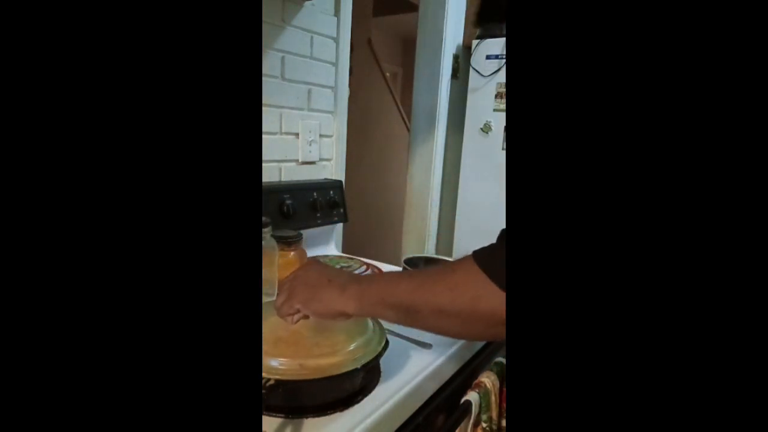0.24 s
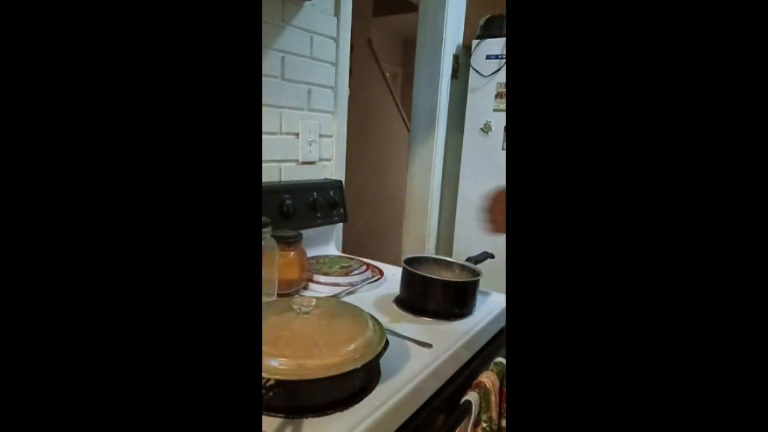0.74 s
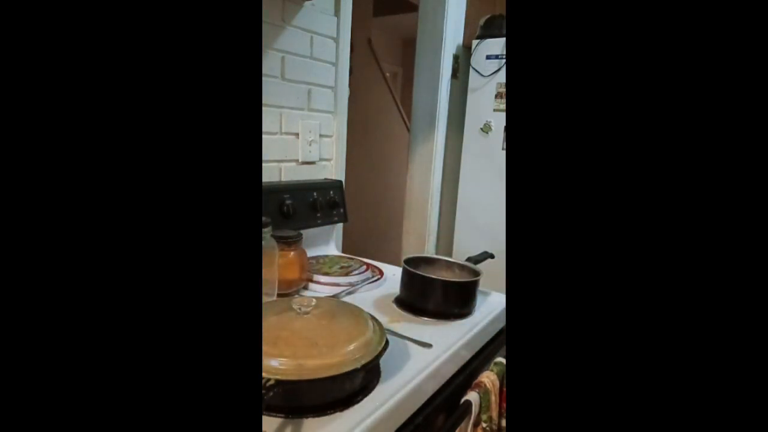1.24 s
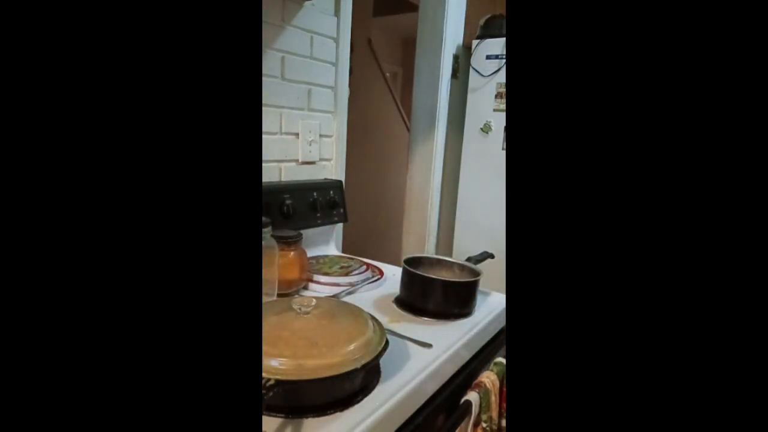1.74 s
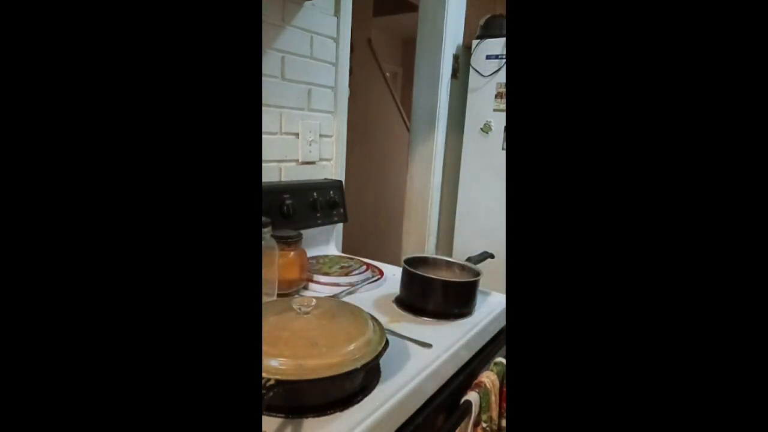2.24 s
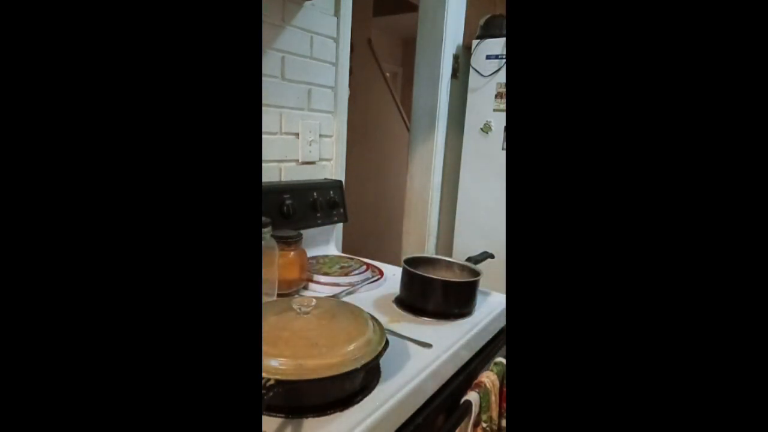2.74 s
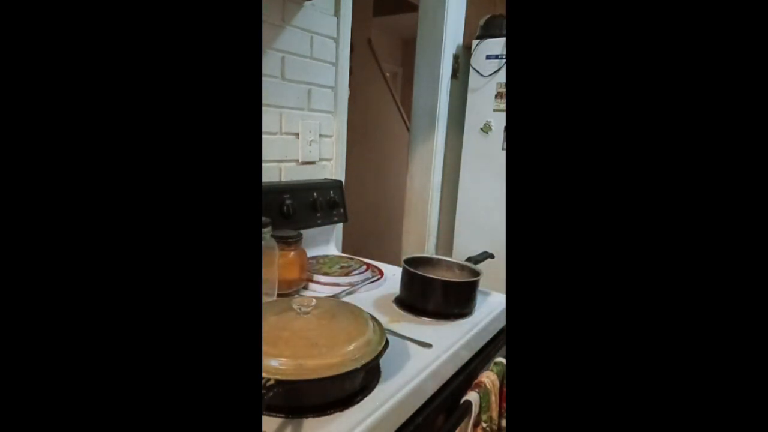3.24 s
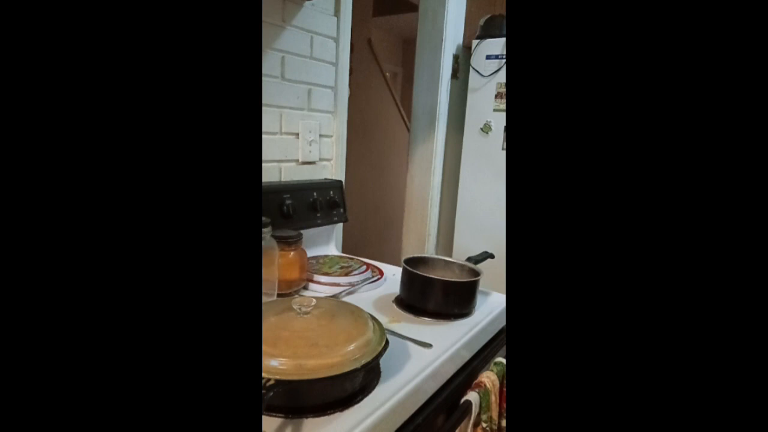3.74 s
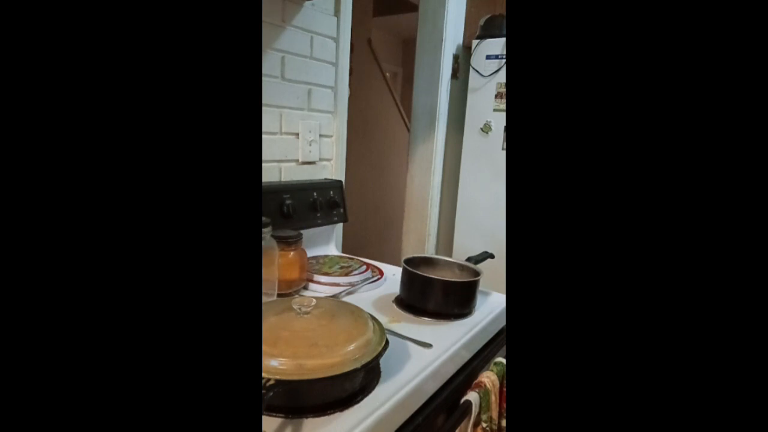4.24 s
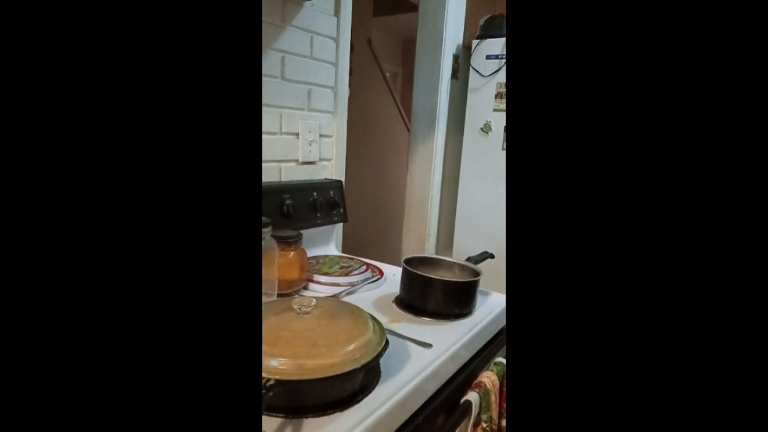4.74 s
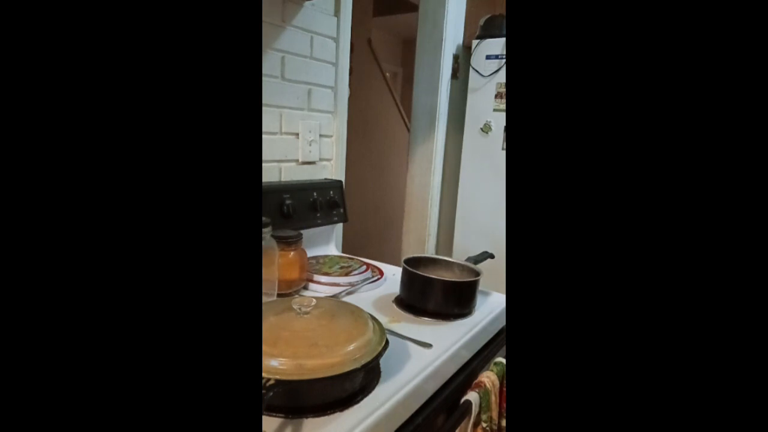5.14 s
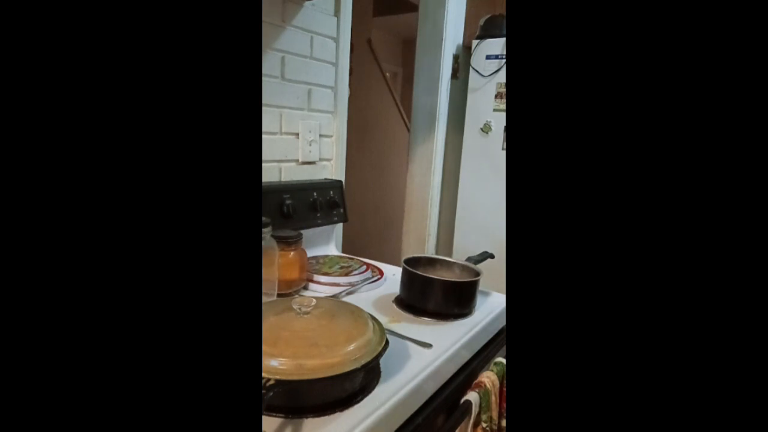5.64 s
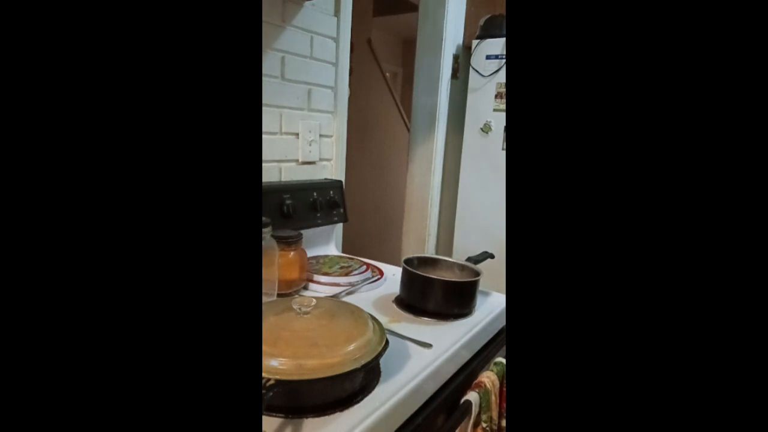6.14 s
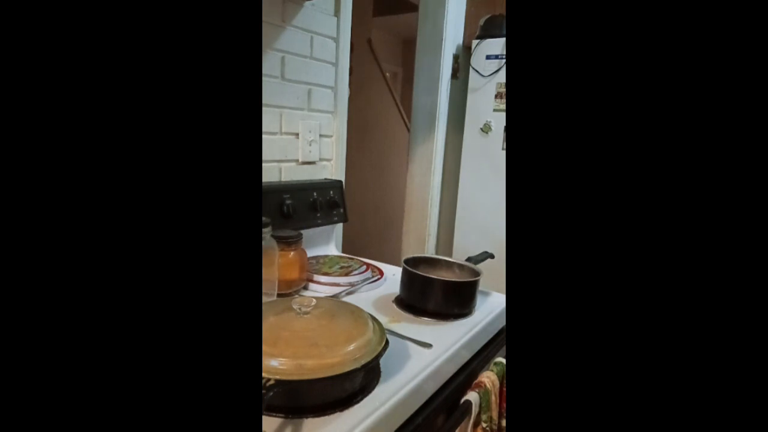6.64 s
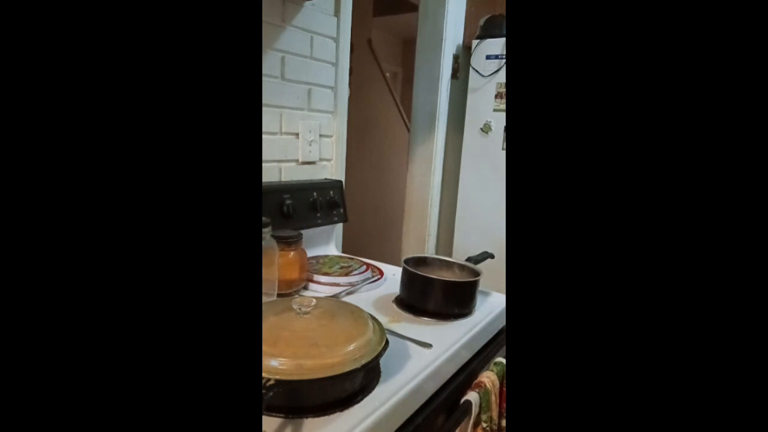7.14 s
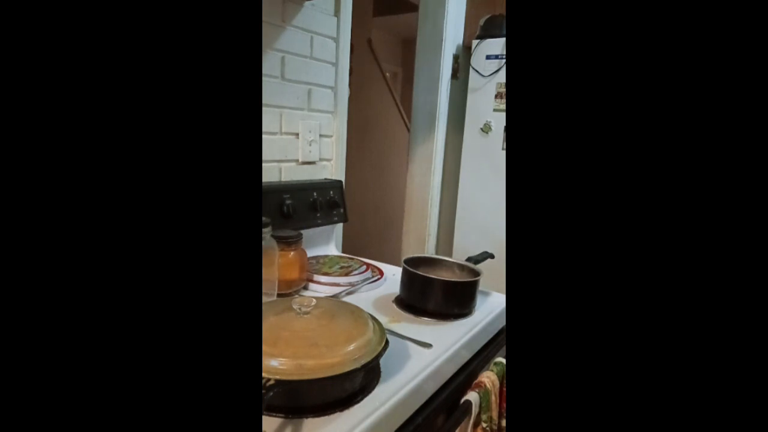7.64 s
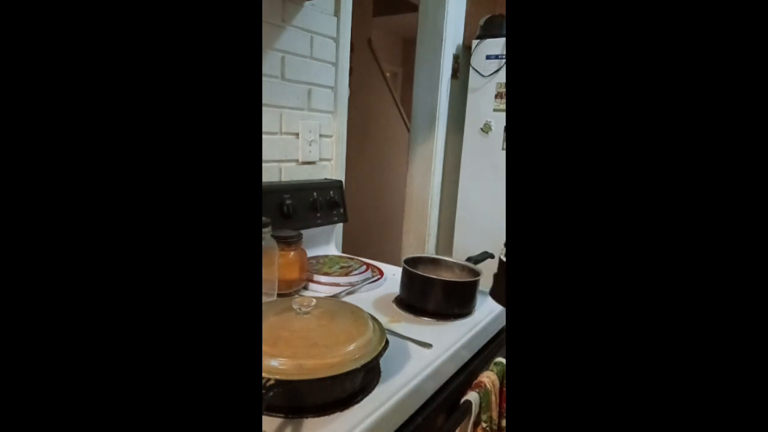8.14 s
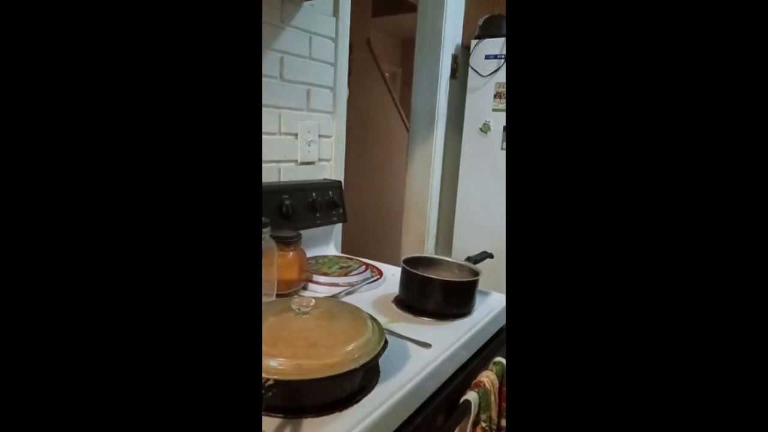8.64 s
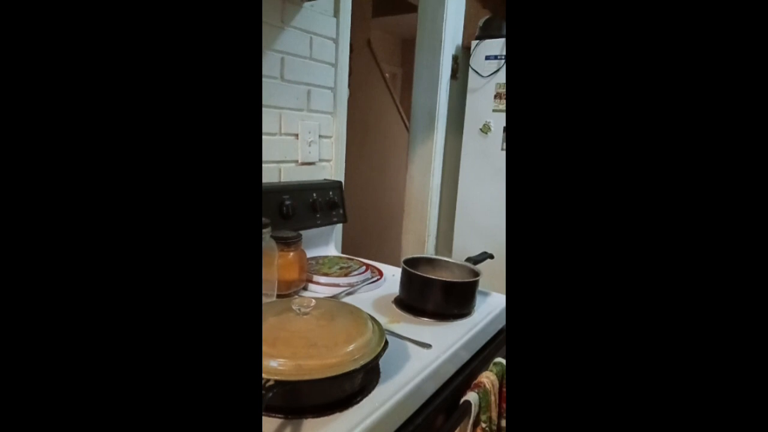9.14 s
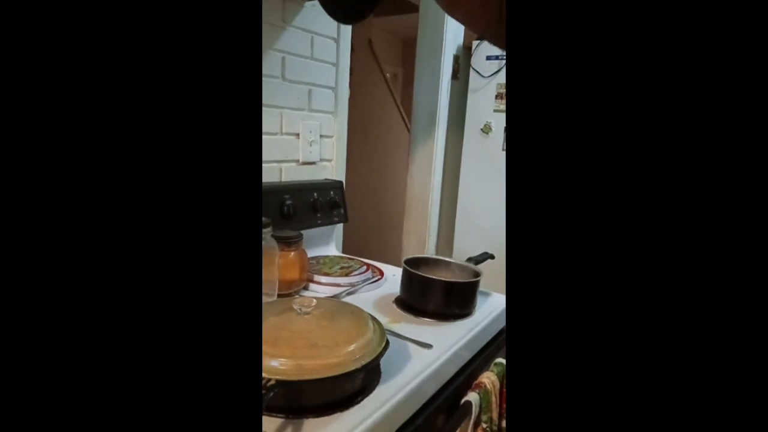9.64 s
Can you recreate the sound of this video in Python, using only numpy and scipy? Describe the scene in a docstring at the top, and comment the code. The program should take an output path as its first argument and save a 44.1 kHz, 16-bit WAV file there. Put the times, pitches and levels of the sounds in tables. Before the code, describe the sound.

Thin aluminium foil pan crumpled in sharp crackling bursts in a small kitchen, pausing and rustling, then buckling loudly and ringing before falling quiet.

```python
"""A thin aluminium foil pan is crumpled, shifted and set down in a small hard kitchen, with a low room hum of
shaped noise under all. The hand grips: creases of three sizes buckle in showers of filtered clicks, and dented
panels flip as noisy pitched rings. Throughout, among the grips, single folds snap as short bright cracks, and
soft thumps of low sines come through the floor. Late on, the pan floor rings as its modes are tapped. Sparse
echo taps make the room, and the microphone port peaks sharply in the treble."""
import sys
import numpy as np
from scipy import signal
from scipy.io import wavfile
from scipy.ndimage import uniform_filter1d

SR = 44100
rng = np.random.default_rng(int(sys.argv[2]) if len(sys.argv) > 2 else 0)


def waveform_to_disk(signal):
    """Save audio, clipped to [-1, 1], as 16-bit WAV at the path in sys.argv[1]."""
    frames = np.transpose(np.atleast_2d(signal))
    scaled = np.clip(frames, -1, 1) * 32767
    samples = np.round(scaled).astype(np.int16)
    wavfile.write(sys.argv[1], SR, samples)


N = 436149  # length in samples


def gain_of(db):
    """Decibels to an amplitude factor."""
    return 10 ** (np.asarray(db) / 20)


def read(points, hz):
    """A spectrum table read on a log-frequency axis."""
    table_hz, value = np.transpose(points)
    return np.interp(np.log(hz + 1), np.log(table_hz + 1), value)


def patches(shape, bins, frames):
    """Smooth chance over frequency and time, of spread 1; shape is (frames, bins), the result is turned."""
    field = uniform_filter1d(rng.standard_normal(shape), frames, 0)
    field = uniform_filter1d(field, bins, 1).T
    return field / field.std()


def alike(z, hz):
    """Long waves reach both microphones alike, so the low bins of the two spectra share more of their sound."""
    # likeness of left and right in diffuse sound: pitch_hz [Hz], likeness [0 to 1]
    likeness = [(60, 0.93), (200, 0.82), (640, 0.18), (2000, 0.049)]
    same = np.clip(read(likeness, hz), -1, 1)[:, None]
    return np.array([z[0], same * z[0] + np.sqrt(1 - same ** 2) * z[1]])


def hum():
    """Room tone: random short-time spectra with a fixed colour and faint drifting patches."""
    # colour of the room tone: pitch_hz [Hz], relative_density_db [dB per Hz]
    colour = [(32, -25), (60, 8.5), (104, -12), (200, -2), (323, -10), (1150, -26), (4200, -40),
              (16000, -51.5)]
    level_db = -48.5
    hz, frames = np.fft.rfftfreq(1024, 1 / SR), N // 256 + 5
    real, imag = rng.standard_normal((2, 2, len(hz), frames))
    drift_db = 1.5 * patches((frames, len(hz)), 6, 30)
    z = alike(real + 1j * imag, hz) * gain_of(read(colour, hz)[:, None] + drift_db)
    x = signal.istft(z, nperseg=1024, noverlap=768)[1][:, :N]
    return gain_of(level_db) * x / x.std()


def band(x, lo_hz, hi_hz):
    """Band-pass."""
    edges_hz = [lo_hz, min(hi_hz, SR / 2.1)]
    return signal.sosfilt(signal.butter(3, edges_hz, "band", fs=SR, output="sos"), x)


def clicks(per_s, spread_db):
    """Random clicks, many small and a few large, of mean power 1."""
    size = gain_of(spread_db * np.minimum(rng.exponential(1, N), 5))
    size *= rng.choice([-1, 1], N)
    train = size * (rng.random(N) < per_s / SR)
    return train / np.sqrt(np.mean(train ** 2))


def foil_ring(lo_hz, hi_hz, t60_s, shiver, size=4000):
    """A buckling tick and the dense shiver of the sheet, different at each microphone; energy 1 in each."""
    t = np.arange(size) / SR
    decay = gain_of(-60 * t / np.clip(t60_s, .005, 1))
    ring = shiver * rng.standard_normal((2, size)) * decay
    ring[[0, 1], rng.integers(0, 24, 2)] += 1  # the spot lies nearer to one microphone
    ring = band(ring, lo_hz, hi_hz)
    return ring / np.linalg.norm(ring, axis=1)[:, None]


def grip_power():
    """Each grip of the hand closes, holds, then fades; power for every crease size, by the millisecond."""
    # grips: hold_start_s [s], rise_s [s, 2 ms or more], hold_s [s], fade_s [s, 10 ms or more],
    # fine_db [relative dB], middle_db [dB above fine], wide_db [dB above fine]; each size adds its own level
    grips = [(0.308, 0.011, 0.034, 0.074, -50.5, -20, -41), (0.704, 0.015, 0.0065, 0.11, -49, -20, -38),
             (0.853, 0.04, 0.023, 0.24, -47.5, -16.5, -17), (1.076, 0.025, 0.08, 0.066, -25, -8.5, -11.5),
             (1.139, .02, 0.099, 0.29, -28, -10.5, -19.5), (1.448, 0.059, 0.074, 0.038, -42.5, 0.5, -20),
             (1.49, 0.006, 0.048, 0.53, -24.5, -15, -16.5), (1.581, 0.017, 0.022, 0.16, -26.5, -9, -23),
             (1.647, 0.025, 0.034, 0.61, -26.5, -14.5, -12), (1.789, 0.011, 0.078, 0.11, -30, -7.5, -21),
             (1.988, 0.004, 0.041, 0.092, -28, -10.5, -31), (2.158, 0.014, 0.0086, 0.071, -40, -22, -24),
             (2.233, 0.034, 0.031, 0.16, -43.5, -4, -10), (2.305, 0.023, 0.032, 0.21, -40, -6.5, -18),
             (2.555, 0.0048, 0.035, 0.17, -45, -5.5, -14), (2.695, 0.0062, 0.015, 0.1, -49, 7, -39),
             (2.783, 0.0037, 0.025, 0.12, -47.5, 6, -37), (2.964, 0.02, 0.055, 0.15, -41.5, -8.5, -16),
             (3.066, 0.013, 0.022, 0.68, -36.5, -19.5, -35), (3.201, 0.11, 0.015, 0.17, -53, 4.5, 0),
             (3.316, 0.036, 0.077, 0.13, -25.5, -7, -8), (3.53, 0.0094, 0.0056, 0.17, -42, -0.5, -44),
             (3.587, 0.0051, 0.013, 0.17, -32, -16.5, -21), (3.79, 0.16, 0.092, .1, -45, -12, -9),
             (3.82, 0.01, 0.01, 0.42, -33, -3.5, -2.5), (4.194, 0.003, 0.012, 0.28, -43.5, -11.5, -17.5),
             (4.413, 0.0092, 0.042, 0.13, -55, -10.5, 3.5), (4.567, 0.032, 0.086, 0.096, -33.5, -9, -3.5),
             (4.674, 0.0087, 0.051, 0.055, -42.5, -6.5, 1), (4.782, 0.14, 0.014, 0.48, -40, -19.5, -10),
             (5.001, 0.032, 0.014, 0.11, -36, -9, -1), (5.06, 0.016, 0.016, 0.11, -37.5, -8, -5.5),
             (5.247, 0.044, 0.03, 0.62, -52.5, -11.5, -6), (5.566, 0.007, 0.006, 0.18, -49, -15, -38),
             (5.684, 0.009, 0.0074, 0.16, -31.5, -11.5, -7), (5.81, 0.02, 0.097, 0.32, -41, -12, -19),
             (6.049, 0.049, 0.022, 0.12, -39, -11.5, -10.5), (6.273, 0.079, 0.023, 0.13, -33, -10, 4.5),
             (6.323, 0.012, 0.094, 0.38, -24, -10, -2.5), (6.591, 0.015, 0.059, 0.11, -26, -6.5, 3),
             (6.683, .05, 0.1, 0.38, -40, -7, -2.5), (7.13, 0.008, 0.036, 0.34, -25.5, -5, -5),
             (7.407, 0.0018, 0.097, 0.1, -36, -11.5, -5.5), (7.66, 0.2, 0.071, 0.15, -48, -8, -5.5),
             (7.78, .006, 0.22, 1, -34, -6, -1), (7.929, 0.31, 0.43, 0.12, -26, -14, -6.5),
             (8.466, .02, 0.0086, 0.85, -64, -13, -16.5), (9.317, 0.03, 0.018, 0.11, -54.5, -9.5, -30)]
    slope_db = -30  # one rise time before the hold, or one fade time after it for fine creases
    start, rise, hold, fade, fine_db, middle_db, wide_db = np.transpose(grips)[:, :, None]
    t = np.arange(0, N / SR + .01, .001) - start
    before = np.maximum(-t, 0) / np.maximum(rise, .002)
    after = np.maximum(t - hold, 0) / np.maximum(fade, .01)
    powers = []
    for size_db, haste in ((0, 1), (middle_db, 1.3), (wide_db, 1.3)):  # larger creases settle sooner
        grip_db = fine_db + size_db + slope_db * (before + haste * after)
        powers.append((gain_of(grip_db) ** 2).sum(0))
    return powers


def crumple(spots=6):
    """Showers of clicks from creases of each size, spread over several spots of the sheet."""
    # crease sizes, fine to wide: low_hz [Hz], high_hz [Hz] (outer edges, narrowed per spot), clicks_per_s [1/s],
    # size_spread_db [dB], ring_t60_s [s], relative_level_db [dB]
    creases = [(3020, 15540, 1400, 2.5, 0.034, -2), (1185, 4960, 700, 0.5, 0.079, 11.5),
               (409, 1700, 450, 1.5, 0.077, 4.5)]
    out, time_ms = np.zeros((2, N)), np.arange(N) / SR * 1000
    for power, (lo_hz, hi_hz, per_s, spread_db, t60_s, db) in zip(grip_power(), creases):
        level = gain_of(db) * np.interp(time_ms, np.arange(len(power)), np.sqrt(power))
        train = clicks(per_s, spread_db) * level
        spot = rng.integers(0, spots, N)
        for i in range(spots):
            low, high = rng.uniform(1, 1.4, 2)  # each spot has a colour of its own
            ring = foil_ring(lo_hz * low, hi_hz / high, t60_s, 0.15, size=2048)
            out += signal.oaconvolve((train * (spot == i))[None], ring, axes=1)[:, :N]
    hz, t, z = signal.stft(out, SR, nperseg=512, noverlap=384)
    shape = (len(t), len(hz))
    # the resonances of the sheet shift as it bends, and the creases give way in clumps
    resonance_db = 3.0 * patches(shape, 5, 12)
    clump_db = 0.72 * patches(shape, 66, 3)
    note_db = 5 * np.maximum(patches(shape, 2, 22) - 1, 0)  # brief narrow notes ring out
    z = alike(z, hz) * gain_of(resonance_db + clump_db + note_db)
    return signal.istft(z, SR, nperseg=512, noverlap=384)[1][:, :N]


def pops():
    """A dented panel flips or drags and shivers around its own pitch: wide is a knock, narrow a squeak."""
    # flipping panels: start_s [s], relative_peak_db [dB], pitch_hz [Hz], t60_s [s, before the swell and end fade],
    # spread [factor up and down, 1.02 or more]
    panels = [(0.894, -45, 1930, 0.04, 1.09), (1.25, -32, 1880, 0.25, 1.2), (.404, -66, 2550, 0.15, 0.96),
              (5.574, -53, 1380, 0.075, 1.06), (2.075, -52.5, 1300, .3, 1.02),
              (2.153, -51, 3000, 0.18, 1.14), (2.246, -49, 1010, 0.27, 1.03),
              (3.531, -41, 2750, 0.037, 1.08), (3.735, -44, 1660, 0.7, 1.06), (3.971, -45, 1030, 1, 1.1),
              (3.799, -51, 314, 0.8, 0.95), (4.198, -32.5, 3500, 0.15, 1.13), (6.449, -24, 443, 0.35, 1.6),
              (.312, -54.5, 4250, 0.2, 1.07), (8.351, -43.5, 321, 0.4, 1.05), (2.783, -34, 1960, 0.1, 1.12),
              (7.146, -23, 1245, 0.091, 1.06), (7.248, -20.5, 1390, 0.2, 1.087),
              (7.406, -33, 1353, 0.33, 1.105), (7.81, -15.5, 1040, 0.025, 1.38),
              (7.929, -14.5, 1120, .06, 1.86), (7.989, -25.5, 370, 0.51, 1.68),
              (8.104, -16.5, 530, 0.11, 1.59), (8.298, -25.5, 606, 0.012, 1.21),
              (8.338, -24.5, 590, 0.045, 1.25), (9.078, -32, 1460, 0.017, 1.22),
              (9.777, -49.5, 846, 0.21, 1.13)]
    size = 12000
    out, t = np.zeros((2, N + size)), np.arange(1, size + 1) / SR
    for start_s, db, hz, t60_s, spread in panels:
        spread = max(spread, 1.02)
        ring = foil_ring(hz / spread, hz * spread, t60_s, min(t60_s, 0.16), size=size)
        swell = np.minimum(t / (.05 * t60_s ** 2), 1)  # long drags swell in
        ring = ring * swell * (1 - t / t[-1])  # all fade out
        at = round(start_s * SR)
        out[:, at:at + size] += gain_of(db + 15.5) * ring / abs(ring).max()
    return out[:, :N]


def snaps():
    """Each fold gives a bright crack and a duller part, both with a short shiver."""
    # snapping folds: start_s [s], relative_level_db [dB], relative_dull_db [dB, duller part only]
    folds = [(1.1768, -14, -7.5), (1.2505, -13, -19), (1.4596, -21.5, -10), (1.4985, -14, -14),
             (1.599, -20, -18), (1.988, -16, -42), (2.96, -27.5, -35), (3.59, -13, -39),
             (3.8696, -18.5, -3.5), (3.948, -21, -33), (4.575, -19.5, 3), (4.6727, -15.5, -7),
             (4.814, -22, -15), (4.967, -29.5, -11), (5.03, -25, 2.5), (5.069, -21, -9), (5.276, -43, 8),
             (5.689, -18, -6.5), (5.871, -29, -8.5), (6.3145, -14.5, -21), (6.79, -34, -1),
             (7.1315, -11, -32.5), (7.403, -20, -24), (7.452, -18, -3), (7.763, -13.5, -2),
             (7.961, -20, -31), (7.9845, -15.5, -1), (8.103, -13, -1), (8.711, -41, -38),
             (9.0788, -32.5, -32.5), (9.623, -42.5, -28), (9.7775, -42.5, 6)]
    out = np.zeros((2, N + 4000))
    t60_s, shiver = .03, .13
    for start_s, db, dull_db in folds:
        bright = gain_of(18.5) * foil_ring(2500, 14400, t60_s, shiver)
        dull = gain_of(dull_db + 23.5) * foil_ring(660, 3400, t60_s, shiver)
        at = round(start_s * SR)
        out[:, at:at + 4000] += gain_of(db) * (bright + dull)
    return out[:, :N]


def thumps(t60_s=0.29, rise_s=0.0072):
    """Soft low pushes, steps or knocks on the counter: close low tones, a little out of step left and right."""
    # thumps: start_s [s], relative_level_db [dB], middle_tone_hz [Hz]
    pushes = [(1.501, -50, 99.4), (2.038, -47.5, 139.4), (2.203, -52.5, 61), (2.46, -57, 50),
              (4.45, -52.5, 53.6), (5.059, -49.5, 59.6), (6.26, -46, 75.6), (6.62, -45, 186),
              (7.155, -42, 168), (8.149, -50, 58)]
    size = 12000
    out, t = np.zeros((2, N + size)), np.arange(size) / SR
    ratios = np.array([.75, 1, 1.35])[:, None, None]  # three tones in each lump
    for start_s, db, hz in pushes:
        turns = hz * ratios * t + rng.uniform(0, 0.15, (3, 2, 1))
        tones = np.sin(2 * np.pi * turns).sum(0)
        envelope = gain_of(db + 18.5 - 60 * t / t60_s) * (1 - np.exp(-t / rise_s))
        at = round(start_s * SR)
        out[:, at:at + size] += envelope * tones
    return out[:, :N]


def pan_floor(spread_db=3.5):
    """The landing pan chatters; each mode, a decaying sine, is tapped at its own moments."""
    # modes of the pan floor: pitch_hz [Hz], width_hz [Hz], relative_level_db [dB]
    modes = [(195, 31, -10.5), (662, 23, -5), (1245, 20, -6), (2246, 33, -10), (2410, 28, -10)]
    # chatter of the landing pan: time_s [s], relative_level_db [dB]
    chatter = [(7.14, -38), (7.33, -41), (7.41, -61)]
    t, out = np.arange(8000) / SR, np.zeros((2, N))
    chatter_s, chatter_db = np.transpose(chatter)
    chatter_db = np.interp(np.arange(N) / SR, chatter_s, chatter_db, -100, -100)  # far down outside the table
    for hz, width_hz, db in modes:
        taps = clicks(300, spread_db) * gain_of(chatter_db + db + 17)
        phase = rng.uniform(0, 1, (2, 1))  # radians, one for each side
        mode = np.exp(-np.pi * width_hz * t) * np.sin(2 * np.pi * hz * t + phase)
        out += signal.oaconvolve(taps[None], mode / np.linalg.norm(mode[0]), axes=1)[:, :N]
    return out


def kitchen(x):
    """Small hard room: sparse echo taps of random sign, dying away quickly."""
    t60_s = 0.13
    taps = np.zeros((2, SR // 2))
    grid = np.arange(200, SR // 2 - 20, 20)
    at = grid + rng.integers(0, 20, (2, len(grid)))  # one tap at random in every 20 samples
    np.put_along_axis(taps, at, rng.choice([-1., 1.], at.shape), 1)
    hz, t, z = signal.stft(taps, SR, nperseg=256)
    tail = signal.istft(alike(z, hz) * gain_of(-60 * t / t60_s), SR, nperseg=256)[1]
    tail /= np.linalg.norm(tail, axis=1)[:, None]
    return signal.fftconvolve(x.mean(0)[None], tail, axes=1)[:, :N]


def scene():
    """Foil with its room, over thumps and hum; rustles carry little added echo, blows carry more."""
    # place of the pan: time_s [s], left_minus_right_db [dB]
    place = [(1, -1), (4.3, 1.5), (5.7, -3), (8.2, 1), (9.1, 1)]
    rustle = crumple()
    blows = snaps() + pops() + pan_floor()
    room = kitchen(gain_of(-10.5) * rustle + gain_of(-2.5) * blows)
    side_db = np.interp(np.arange(N) / SR, *np.transpose(place))
    placed = (rustle + blows + room) * gain_of(np.outer([.5, -.5], side_db))
    return placed + thumps() + hum()


def record(dry):
    """The microphone port colours all sound through a causal minimum-phase filter; then the band limit."""
    # response of the microphone port: pitch_hz [Hz], gain_db [dB]
    port_response = [(30, -22.5), (3400, -12), (4500, -7.5), (5300, 0), (6400, 7), (7000, 1), (8400, -19.5),
                     (13500, -22.5), (15300, -7), (16000, -15)]
    edge_hz = 16150
    hz = abs(np.fft.fftfreq(4096, 1 / SR))
    log_gain = np.log(gain_of(read(port_response, hz)))
    phase = -signal.hilbert(log_gain).imag
    port = np.fft.ifft(np.exp(log_gain + 1j * phase)).real[:2048]
    heard = signal.oaconvolve(dry, port[None], axes=1)[:, :N]
    low_pass = signal.firwin(511, edge_hz, window=("kaiser", 9), fs=SR)
    return signal.oaconvolve(heard, low_pass[None], "same")


dry = scene()
out = record(dry)
waveform_to_disk(out)
```